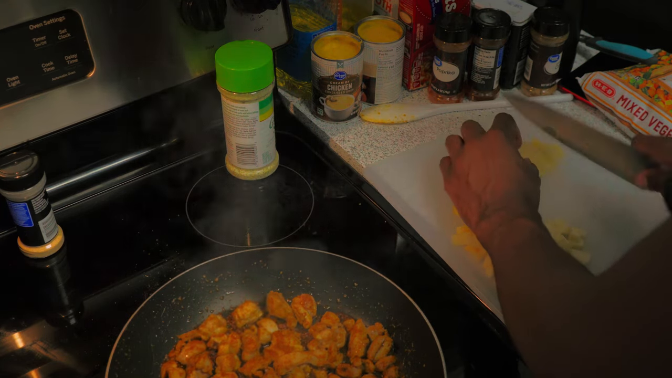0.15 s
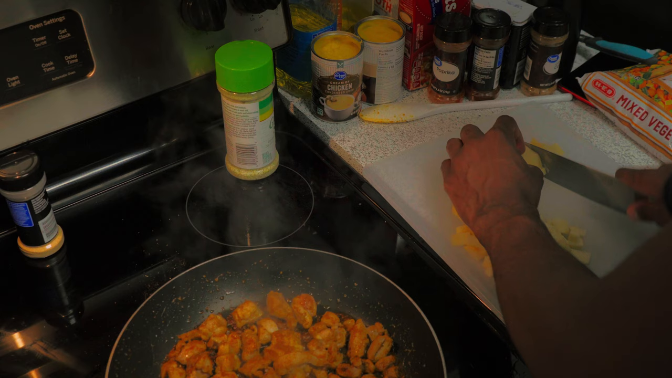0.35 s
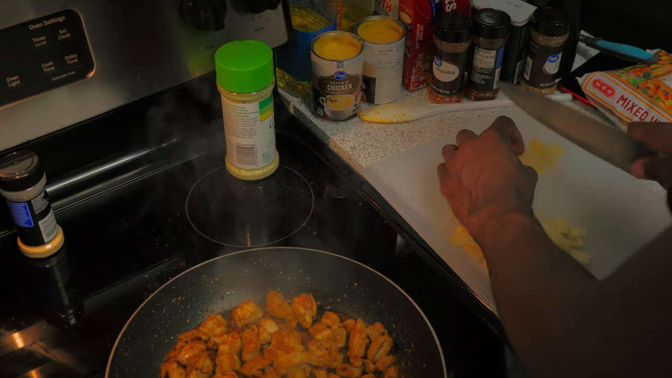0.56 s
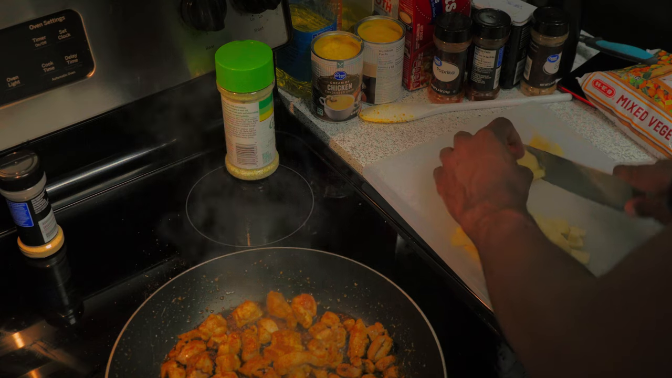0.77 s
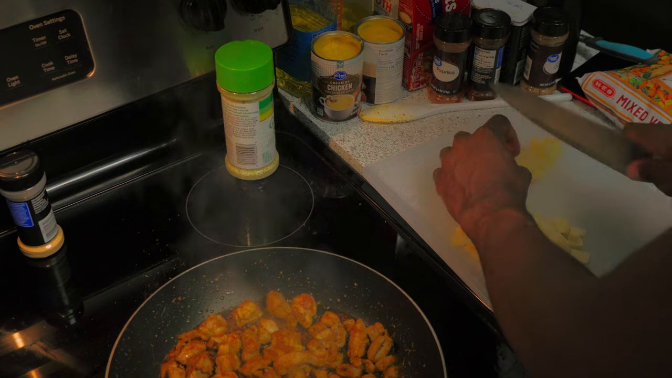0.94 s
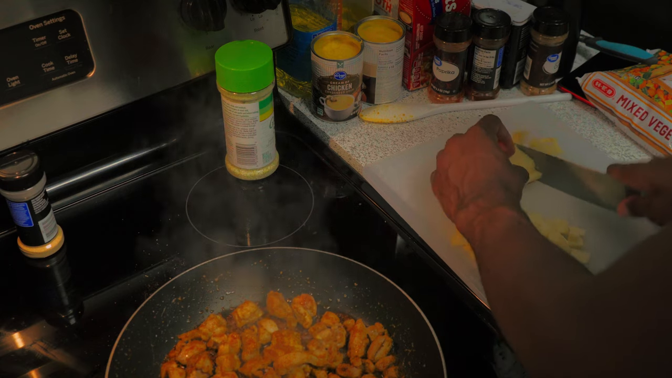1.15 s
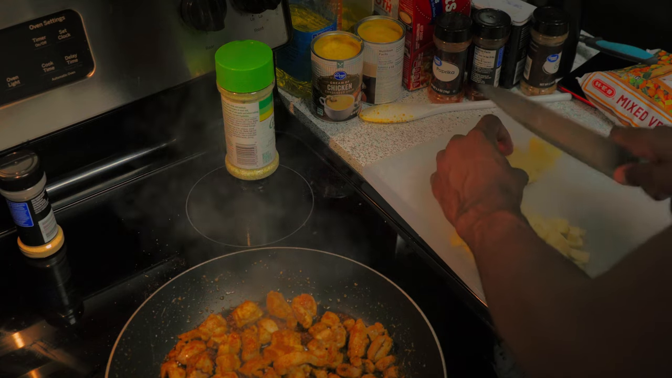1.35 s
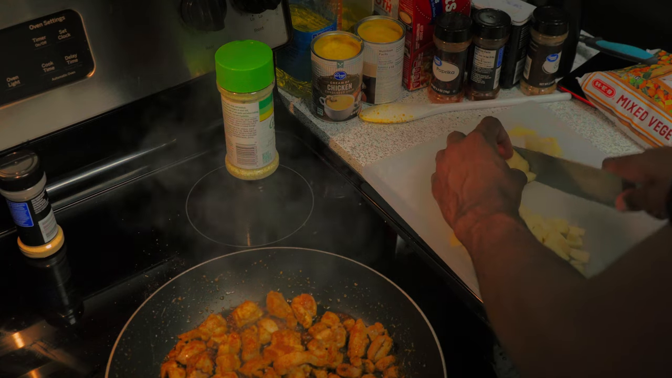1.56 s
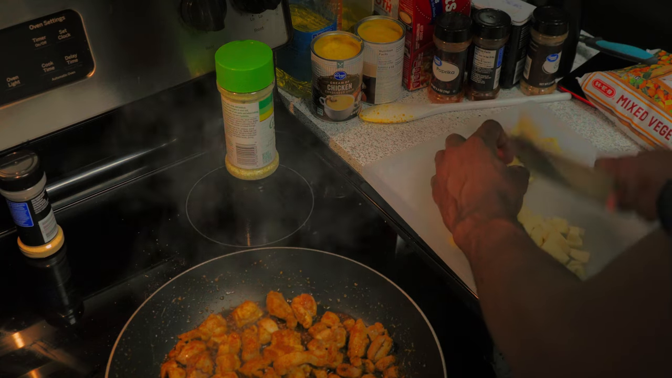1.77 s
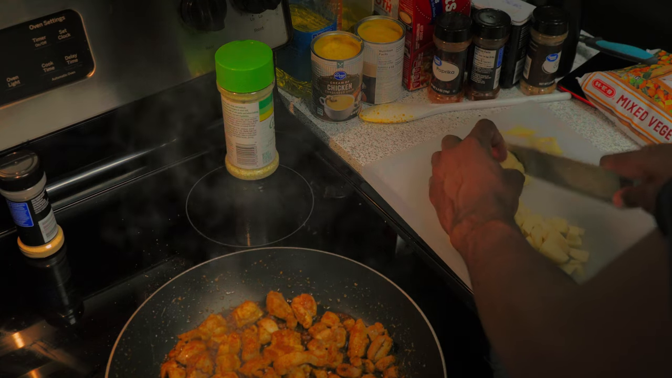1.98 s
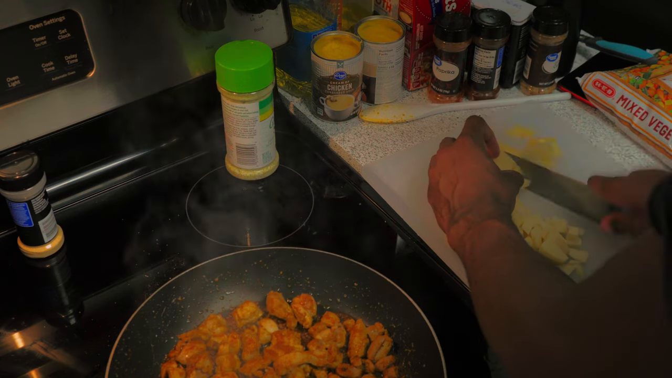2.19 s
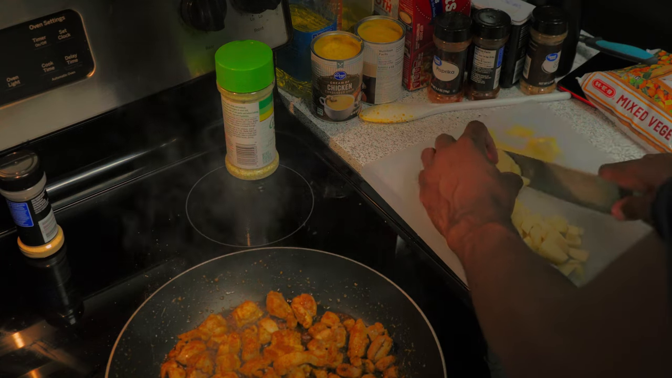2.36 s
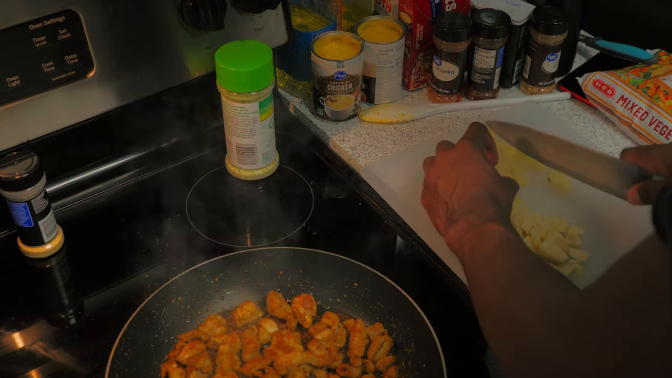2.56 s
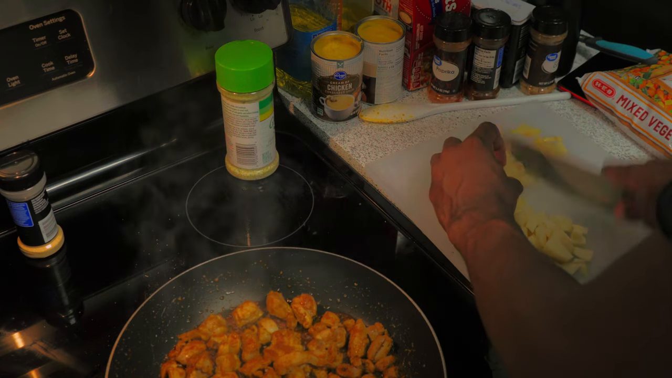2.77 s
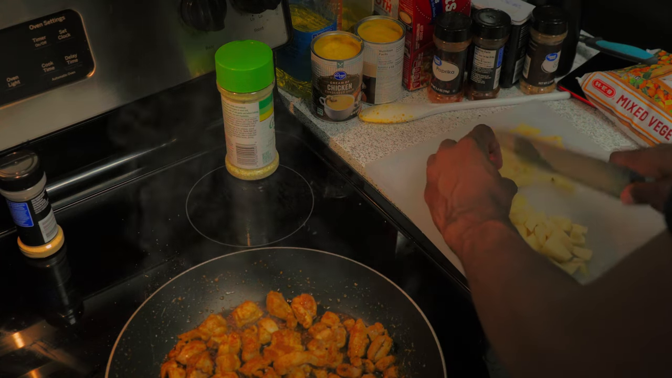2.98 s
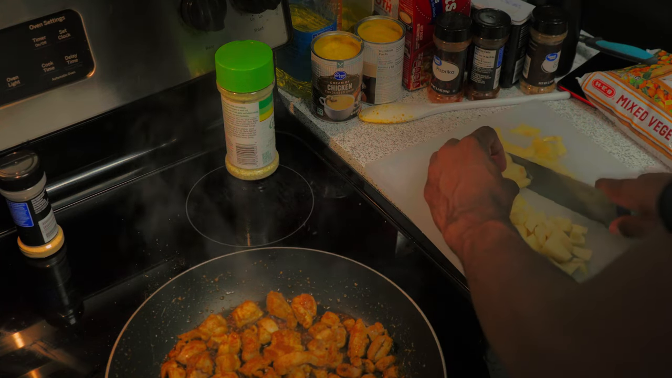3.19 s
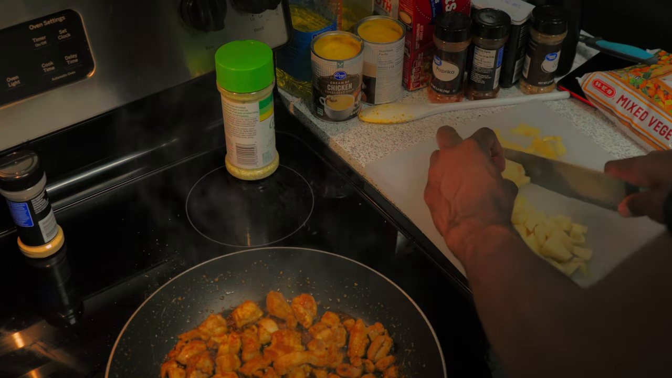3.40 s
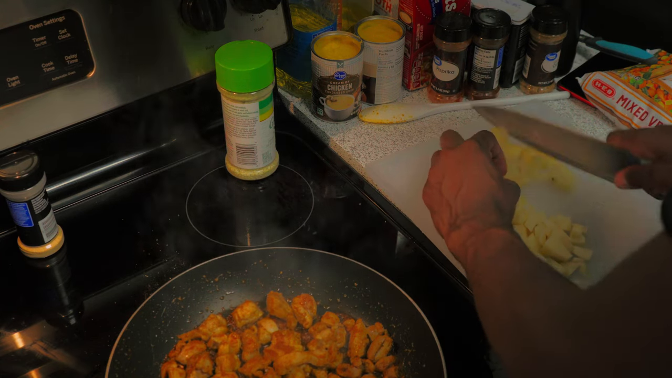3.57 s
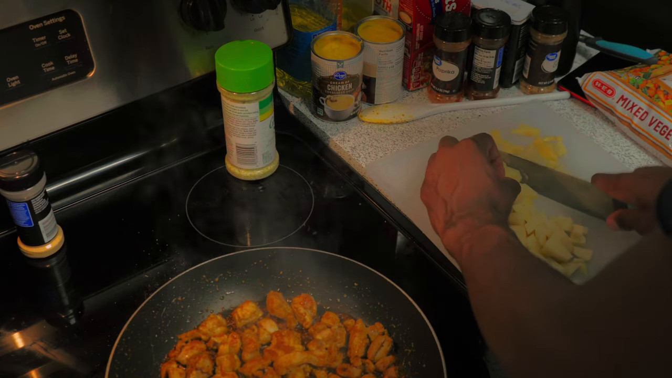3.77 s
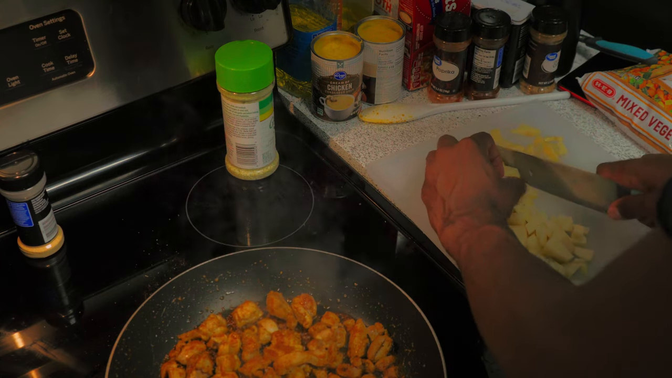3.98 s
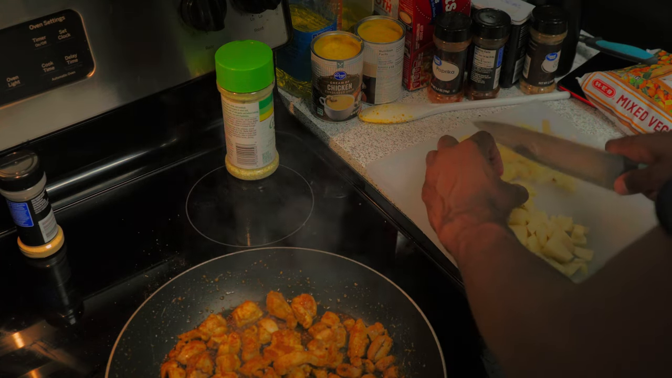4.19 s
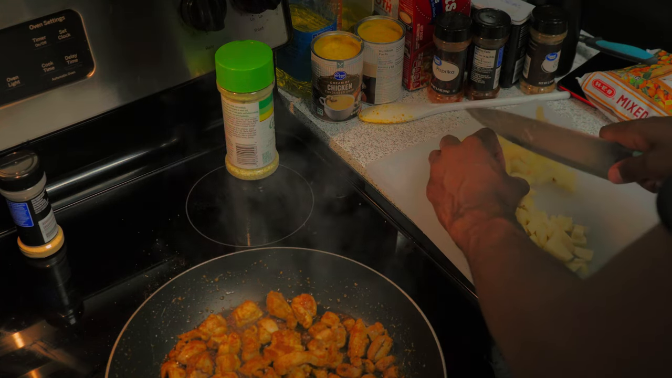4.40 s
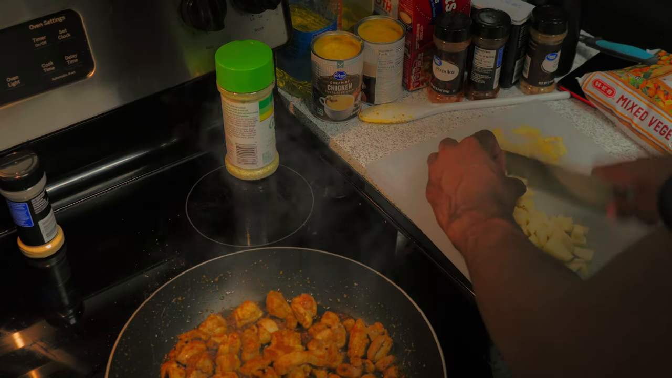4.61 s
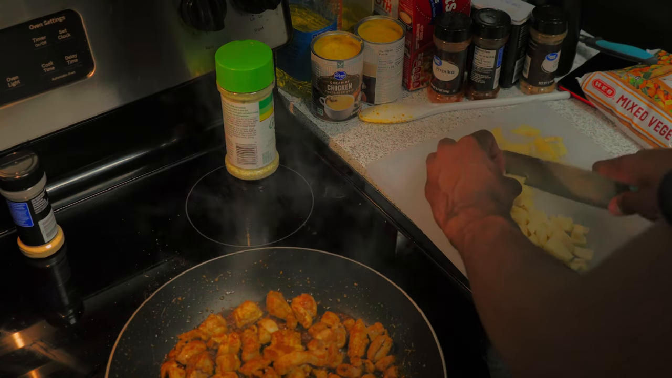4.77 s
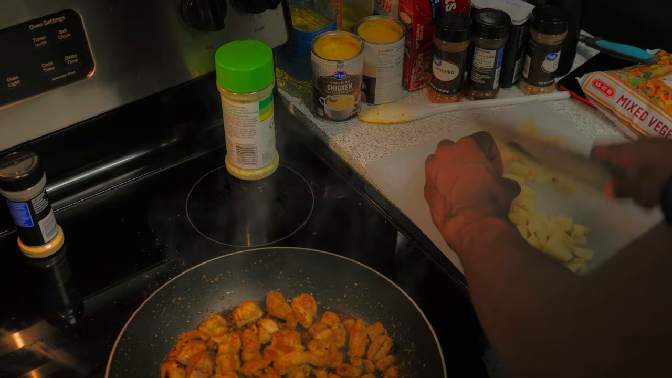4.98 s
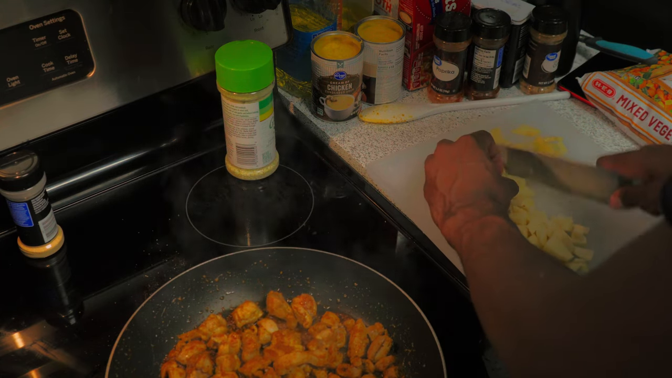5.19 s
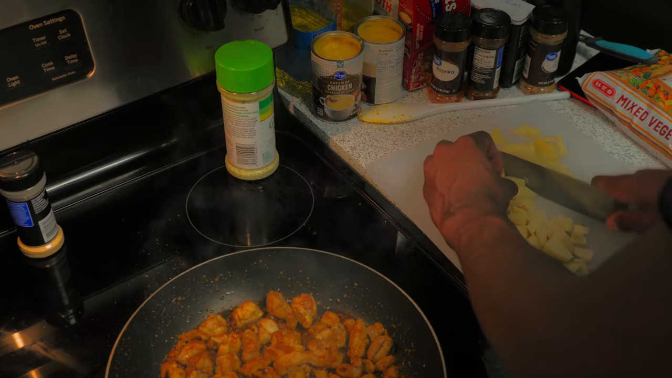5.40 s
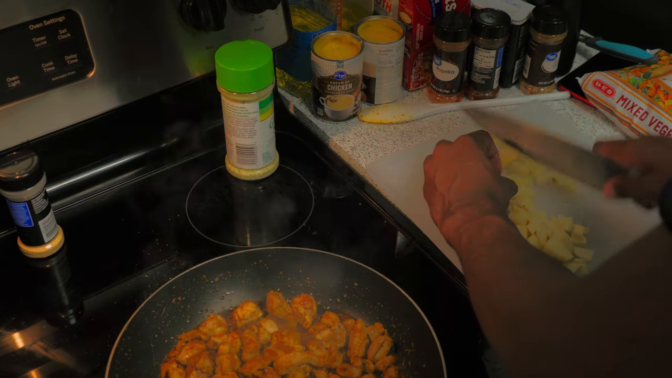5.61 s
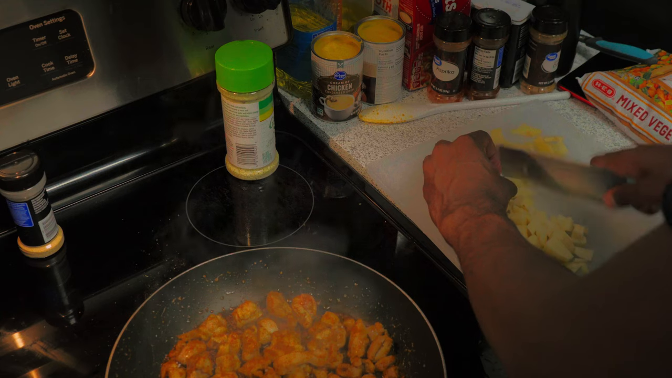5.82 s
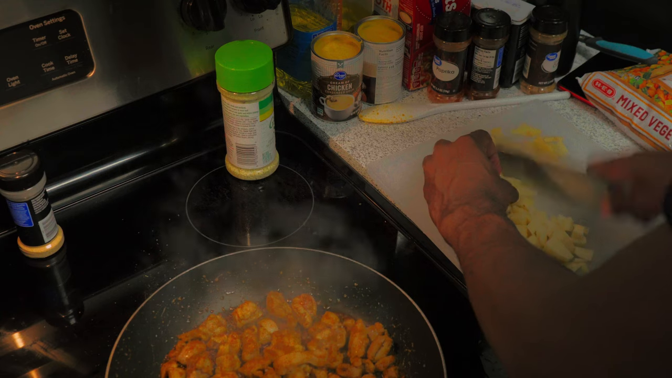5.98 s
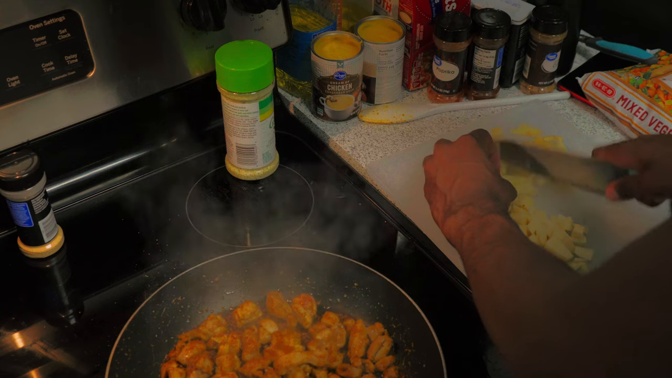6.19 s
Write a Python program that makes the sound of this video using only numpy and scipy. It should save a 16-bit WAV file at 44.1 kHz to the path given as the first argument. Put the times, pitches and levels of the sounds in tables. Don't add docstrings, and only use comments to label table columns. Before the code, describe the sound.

A knife chops potato on a plastic board with hard, ringing cracks while a pan sizzles and a hood fan hums.

```python
import sys
import numpy as np
from scipy import signal
from scipy.fft import rfft, irfft, next_fast_len
from scipy.io import wavfile
from scipy.ndimage import uniform_filter1d

SR = 44100
rng = np.random.default_rng(int(sys.argv[2]) if len(sys.argv) > 2 else 0)


def voltage_ratio(level):
    return 10 ** (np.asarray(level, float) / 20)


def transcribe(signal):
    frames = np.atleast_2d(signal).T
    limited = np.clip(frames, -1, 1)
    pcm = np.round(limited * 32767).astype(np.int16)
    wavfile.write(sys.argv[1], SR, pcm)


N = 275625


def unit(x):
    return x / np.sqrt(np.mean(x ** 2) + 1e-20)


def along(points, hz):
    f, v = np.transpose(points)
    return np.interp(np.log(hz + 1), np.log(f + 1), v)


def filtered(x, response):
    m = next_fast_len(len(x) + 8192)
    spectrum = rfft(x, m) * response(np.fft.rfftfreq(m, 1 / SR))
    return irfft(spectrum, m)[:len(x)]


def resonant(modes):
    def response(f):
        return sum((-1) ** k * voltage_ratio(db) * 1j * f * width / (hz * hz - f * f + 1j * f * width)
                   for k, (hz, width, db) in enumerate(modes))
    return response


def ring(modes, t):
    out = 0
    for hz, db, t60 in modes:
        decay = voltage_ratio(db + rng.normal(0, 2) - 60 * t / t60)
        out = out + decay * np.sin(2 * np.pi * hz * rng.normal(1, .015) * t)
    return out


def patchy(patch_db):
    z = signal.stft(rng.standard_normal(N + 512), nperseg=512)[2]
    field = uniform_filter1d(rng.standard_normal(z.shape), 6, 0)
    field = uniform_filter1d(field, 10, 1)
    return signal.istft(z * voltage_ratio(patch_db * unit(field)), nperseg=512)[1][:N]


def grit(spread_db, share):
    spike = np.minimum(rng.exponential(1, N), 3.5)
    return rng.standard_normal(N) * voltage_ratio(spread_db * spike * (rng.random(N) < share))


# time in seconds, sizzle level in dB, fan level in dB.
PAN = [
    (0, -38, -36.5),
    (1.498, -40, -34.5),
    (2.7, -41, -38),
    (4.3, -43, -39.5),
    (5.0, -41.5, -38.5),
    (6.25, -40, -35),
]
# frequency in Hz, level in dB per Hz.
HOOD = [(12, -29), (20, -13.5), (65, -3.5), (86, -4), (123, 1.5), (151, -6), (240, 5), (300, -9.5),
        (338, 1), (381, -9.5), (492, -1), (670, -12.5), (1200, -37), (1560, -55), (2640, -120)]


def hood_fan():
    s, _, fan_db = np.transpose(PAN)
    rumble = filtered(patchy(patch_db=0.55), lambda hz: voltage_ratio(along(HOOD, hz)))
    return voltage_ratio(np.interp(np.arange(N) / SR, s, fan_db) - 1.5) * unit(rumble)


# frequency in Hz, level in dB per Hz.
SIZZLE = [(400, -26), (750, 3), (1500, 4), (3000, 1.5), (5000, 3), (6800, 1), (9000, -5), (12000, -5.5),
          (14500, -10), (16000, -12)]


def sizzle():
    s, sizzle_db, _ = np.transpose(PAN)
    hiss = unit(patchy(patch_db=.5)) + .5 * unit(grit(spread_db=3.0, share=0.014))
    hiss = filtered(hiss, lambda hz: voltage_ratio(along(SIZZLE, hz)))
    return voltage_ratio(np.interp(np.arange(N) / SR, s, sizzle_db) + 4.0) * unit(hiss)


# start in seconds,
# peak level in dB, pitch in Hz.
SPITS = [(0.2608, -8, 5300), (3.6386, -16, 5170), (4.2107, -11, 6080), (4.3144, -27, 5410),
         (4.3824, -23, 5110), (4.4754, -18, 5730), (4.5024, -32, 4550), (4.9057, -8, 5300),
         (4.9785, -14, 5950), (5.2111, -27, 5110), (5.25, -15, 5060), (5.7105, -17, 5000),
         (0.3934, -30, 8970), (0.4204, -28, 8080), (2.6394, -32, 8100), (2.6694, -32, 9390),
         (4.3154, -32, 8410), (4.3814, -21, 11300), (4.4744, -28, 8140), (4.5014, -26, 12600),
         (5.2609, -32, 8100), (5.3737, -18, 9620)]


def spits():
    out, t = np.zeros(N), np.arange(200) / SR
    for start, db, hz in SPITS:
        swell = voltage_ratio(db - 3 - 60 * t / 0.0028) * (1 - np.exp(-t / 0.00016))
        out[round(start * SR):][:len(t)] += swell * np.sin(2 * np.pi * hz * t)
    return out


# frequency in Hz, t60 in seconds.
KITCHEN = [(100, 0.17), (250, 0.55), (600, 0.44), (1500, 0.58), (4000, 0.55), (8000, 0.6), (14000, 0.1)]


def room_answer(colour_db):
    hz = np.fft.rfftfreq(256, 1 / SR)[:, None]
    t = np.arange(220) * 128 / SR
    shape = (len(hz), len(t))
    z = rng.standard_normal(shape) + 1j * rng.standard_normal(shape)
    tail = signal.istft(z * voltage_ratio(colour_db(hz) - 60 * t / along(KITCHEN, hz)), nperseg=256)[1]
    tail = tail * (1 - np.exp(-np.arange(len(tail)) / SR / .006))
    return tail / np.linalg.norm(tail)


# start in seconds, knock level in dB, knock pitch in Hz, counter bump in dB.
TOUCHES = [(.342, -8.5, 990, -16), (.726, -14.5, 1040, -9), (0.755, -9.5, 1030, -24),
           (1.098, -32, 1050, -11.5), (1.12, -14, 1100, -22), (1.129, -20, 1070, -28),
           (1.477, -37, 980, -23), (1.494, -25, 1000, -30), (1.5, -9, 980, -30), (1.862, -13, 955, -20),
           (1.869, -17, 960, -11), (2.246, -7, 960, -23), (2.251, -9, 950, -32), (2.8697, -5, 6000, -30),
           (3.254, -23, 1050, -25), (3.259, -12.5, 1050, -24), (3.756, -33, 1010, -18),
           (3.797, -37, 1020, -18), (5.084, -9.5, 935, -27), (5.724, -12, 1030, -28),
           (5.772, -30, 1070, -20), (5.779, -15, 1060, -9.5), (6.0688, -5.5, 930, -36)]


def touches():
    out, t = np.zeros(N + SR), np.arange(SR // 10) / SR
    knock_t60_s, bump_t60_s = 0.015, 0.049
    for s, board_db, board_hz, bump_db in TOUCHES:
        knock = voltage_ratio(board_db + 5 - 60 * t / knock_t60_s) * np.sin(2 * np.pi * board_hz * t)
        knock = knock * (1 - np.exp(-t / 0.0011))
        bump = ring([(115, bump_db, bump_t60_s), (230, bump_db - 8, bump_t60_s)], t)
        bump = bump * (1 - np.exp(-t / 0.002))
        out[round(s * SR):][:len(t)] += knock + bump
    return out[:N]


# frequency in Hz, width in Hz, level in dB.
BLADE = [(2700, 690, 2), (3530, 980, 9.5), (4830, 950, 4.5)]


def rubbing_voices():
    rasping = grit(spread_db=3, share=.02)
    board = resonant([(1050, 450, 0)])
    counter = resonant([(120, 90, 0), (240, 140, -2)])
    voices = [filtered(grit(spread_db=2.5, share=.05), resonant([(7000, 4000, -3), (12500, 7000, 0)])),
              filtered(rasping, resonant([(2900, 2200, 7.5), (5470, 3900, 5.0)])),
              filtered(rng.standard_normal(N), lambda hz: board(hz) ** 2),
              filtered(rng.standard_normal(N), lambda hz: counter(hz) ** 2),
              filtered(rasping, resonant(BLADE))]
    return [v / np.sqrt(abs(uniform_filter1d(v ** 2, size=500)) + 0.051 * np.mean(v ** 2)) for v in voices]


def held(start, end, t):
    return np.clip(np.minimum((t - start) / .002, (end - t) / .003 + 1), 0, 1)


# start in seconds, end in seconds, blade level in dB, board level in dB.
SCRAPES = [
    (5.721, 5.735, -27, -28),
    (5.739, 5.758, -29.5, -25.5),
    (5.759, 5.783, -27.5, -26),
    (5.798, 5.852, -32, -40.5),
]


def scrapes(voices):
    wet, rasp, board, counter, blade = voices
    out, t = np.zeros(N), np.arange(N) / SR
    drag = blade + voltage_ratio(-3.5) * rasp + voltage_ratio(-14) * wet + voltage_ratio(-3) * counter
    for start, end, blade_db, board_db in SCRAPES:
        out += held(start, end, t) * (voltage_ratio(blade_db) * drag + voltage_ratio(board_db) * board)
    return out


# entry in seconds, exit in seconds, pressure at entry in dB, at exit in dB,
# wetness in dB.
SLICES = [(.341, 0.36, -30, -24, -7), (0.719, 0.77, -35, -34, -3), (1.096, 1.142, -32.5, -34.5, -3),
          (1.477, 1.522, -37, -28, 0), (1.841, 1.873, -44, -31, 4), (2.222, 2.27, -42, -27, -1),
          (2.837, 2.858, -40, -37, -4), (2.86, 2.871, -30, -27, 3), (3.225, 3.269, -40, -35.5, -1),
          (3.754, 3.77, -42, -35, 1), (3.788, 3.825, -30, -29.5, -10), (4.678, 4.693, -39, -24, -12),
          (5.083, 5.096, -28, -21, -10), (5.409, 5.418, -46, -16, -15), (6.07, 6.076, -47, -19, -2)]


def slices(voices):
    wet, rasp, board, counter, _ = voices
    out, t = np.zeros(N), np.arange(N) / SR
    for entry, end, entry_db, exit_db, wet_db in SLICES:
        end = min([end] + [s - .002 for s, *_ in BLOWS if s > entry])
        pressure = held(entry, end, t) * voltage_ratio(np.interp(t, [entry, end], [entry_db, exit_db]))
        out += pressure * (rasp + voltage_ratio(wet_db) * wet + voltage_ratio(-1) * board + voltage_ratio(4) * counter)
    return out


def cuts():
    voices = rubbing_voices()
    out = touches() + slices(voices) + scrapes(voices)
    return out + voltage_ratio(-12.5) * signal.fftconvolve(out, room_answer(lambda hz: 0))[:N]


# frequency in Hz, level in dB per Hz.
ECHO_COLOUR = [(41, -43), (70, -13), (108, -11), (155, -5), (223, 3), (529, 1), (649, -0.5), (727, 6.5),
               (913, 1), (1340, 0), (3190, -8), (5750, -9.5), (16000, -36.5)]
# frequency in Hz, level in dB.
HOLLOW = [(780, -8), (873, -2.5), (902, -0.5), (927, -3), (975, -5.5), (1053, -3), (1137, -27), (1345, -19),
          (1495, -32)]


def room_ringing(board_hz, edge_db):
    def colour_db(hz):
        note_db = 6 / (1 + ((hz - board_hz) / 110) ** 2)
        bright_db = 0.99 * (edge_db + 11) / (1 + ((hz - 3200) / 1300) ** 2)
        dull_db = .5 * (edge_db + 11.5) / (1 + (5000 / (hz + 1)) ** 6)
        return along(ECHO_COLOUR, hz) + note_db + bright_db - dull_db

    tail = room_answer(colour_db)
    t = np.arange(len(tail)) / SR
    tones = np.zeros(len(t))
    for hz, db in HOLLOW:
        near_db = 6 / (1 + ((hz - board_hz) / 90) ** 2) + rng.normal(0, 3)
        tones += voltage_ratio(db + near_db) * np.sin(2 * np.pi * (hz * t + rng.random()))
    tones = tones * voltage_ratio(-60 * t / .6) * (1 - np.exp(-t / .02))
    return tail + voltage_ratio(-10.5) * tones / np.linalg.norm(tones)


# frequency in Hz, level in dB, t60 in seconds.
CABINET = [(81, -8, 0.27), (103.6, -2, 0.26), (214, -9, .22), (231, -4, 0.28), (248, -6, 0.25)]
# frequency in Hz, width in Hz, level in dB.
COUNTER = [(104, 44, -19), (194.5, 21, -3), (239.3, 20.4, -4.5), (245.9, 13.3, -0.5), (330, 88, -11)]


def counter_thud(t):
    cabinet = np.zeros(len(t))
    for hz, db, t60 in CABINET:
        cabinet += voltage_ratio(db - 60 * t / t60) * np.sin(2 * np.pi * hz * (t + 0.0039))
    cabinet *= 1 - np.exp(-t / 0.014)
    counter_ring = filtered(1. * (t == 0), resonant(COUNTER))
    shake = voltage_ratio(-60 * t / 0.29) * rng.standard_normal(len(t))
    shake = signal.fftconvolve(shake, counter_ring)[:len(t)]
    return voltage_ratio(-3) * shake / abs(shake).max() + cabinet


# frequency in Hz, level in dB, t60 in seconds.
BOARD = [(1364, -2.5, 0.018), (1625, -2.5, 0.013), (1910, -13.5, 0.034)]
# frequency in Hz, level in dB, t60 in seconds.
EDGE = [(2670, -2, 0.026), (3394, -2, 0.025), (4100, -20, 0.055), (4610, -15, 0.036), (5880, -17.5, 0.036),
        (6900, -26, 0.019)]


def board_crack(board_hz, edge_db, t):
    note = np.sin(2 * np.pi * board_hz * t) * voltage_ratio(-60 * t / .028) + ring(BOARD, t)
    crack = filtered(rng.standard_normal(len(t)), resonant([(5000, 2440, 1.56)]))
    crack = voltage_ratio(1.5 - 60 * t / 0.022) * crack
    bright = voltage_ratio(-1.5) * ring(EDGE, t) + voltage_ratio(-.6 * (edge_db + 6)) * crack
    return note + voltage_ratio(edge_db - 0.5) * bright


# start in seconds, blow level in dB, board pitch in Hz, edge brightness in dB, room in dB.
BLOWS = [(0.363, 4.5, 1055, -7.5, -1.5), (0.761, 4, 1040, -7, -2.5), (1.137, 4, 1070, -7.5, -1.5),
         (1.5076, 0, 1015, -5, 1), (1.875, 1, 970, -5, 0.5), (2.257, 1, 950, -4.5, -0.5),
         (2.8736, -0.5, 1090, -5.5, 0.5), (3.265, -0.5, 1074, -5, 0.5), (3.819, -1, 1070, -5.5, 0),
         (4.694, -5.5, 1024, -2, 0), (5.092, -4.5, 926, -1.5, 1), (5.42, -6, 880, 0.5, 2),
         (6.074, 3, 946, -1.5, 0.5)]
# start in seconds, blow level in dB, board pitch in Hz, edge brightness in dB, room in dB.
EXTRA_BLOWS = [
    (-.020, 5, 880, -6, 4),
    (2.8688, -5, 970, -4, -12),
]


def chops():
    lead = SR // 10
    out, t = np.zeros(N + 2 * SR), np.arange(SR // 5) / SR
    for s, db, board_hz, edge_db, room_db in EXTRA_BLOWS + BLOWS:
        thud_db = 5.5 - 0.66 * db + 0.45 * room_db
        sound = voltage_ratio(room_db + 19.0) * room_ringing(board_hz, edge_db)
        sound[:len(t)] += board_crack(board_hz, edge_db, t) + voltage_ratio(thud_db - 18.5) * counter_thud(t)
        out[round((s + .001) * SR) + lead:][:len(sound)] += voltage_ratio(db + 2.0) * sound
    return out[lead:lead + N]


def scene():
    return (hood_fan() + sizzle() + spits() + cuts() + chops())[None]


def ducking(x, limit_db, share, release_db_per_s, start_db):
    over_db = share * np.maximum(20 * np.log10(abs(x) + 1e-9) - limit_db, 0)
    over_db[0] = start_db
    ramp = release_db_per_s * np.arange(N) / SR
    falling_db = np.maximum.accumulate(over_db + ramp) - ramp
    grab = 1 / (.003 * SR)
    return signal.lfilter([grab], [1, grab - 1], falling_db, zi=[start_db])[0]


def band_limit(x):
    return signal.sosfilt(signal.butter(12, 16170, fs=SR, output="sos"), x)


def record(dry):
    top_hz = 15900
    x = filtered(dry[0], lambda hz: (hz < top_hz) * (1j * hz / (1j * hz + 45)) ** 2)
    x = x * voltage_ratio(-ducking(x, limit_db=3.5, share=0.84, release_db_per_s=157, start_db=12))
    x = np.clip(x, -1.2, 1.2)
    x = filtered(x, lambda hz: voltage_ratio(-12 * (hz > top_hz)) * (1j * hz / (1j * hz + 40)) ** 2)
    hum = voltage_ratio(-53.5) * np.sin(2 * np.pi * 29 * np.arange(N) / SR)
    rumble = voltage_ratio(-59) * unit(filtered(rng.standard_normal(N), lambda hz: hz < 34))
    mix = np.clip(x + hum + rumble, -.99, .99)[None]
    return band_limit(mix)


dry = scene()
out = record(dry)
transcribe(out)
```